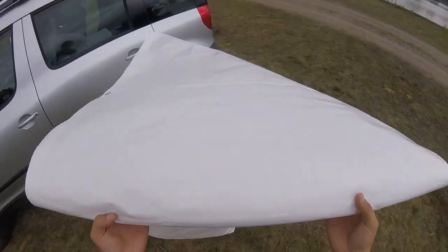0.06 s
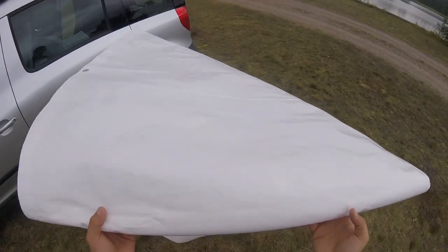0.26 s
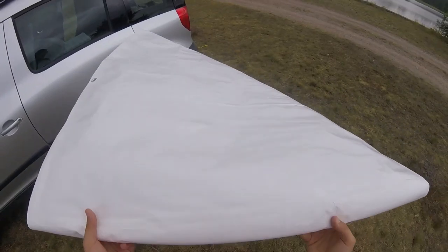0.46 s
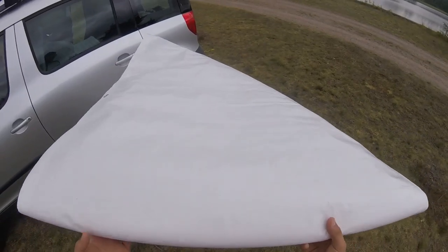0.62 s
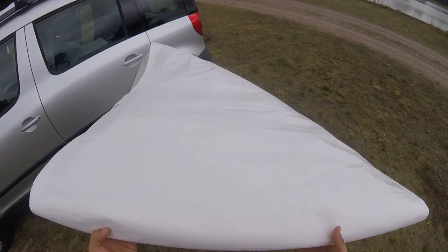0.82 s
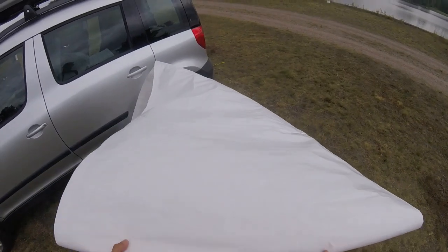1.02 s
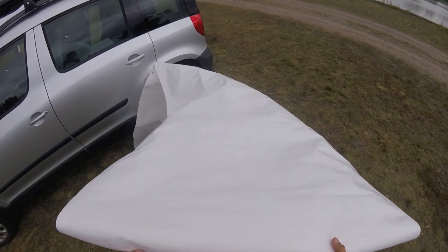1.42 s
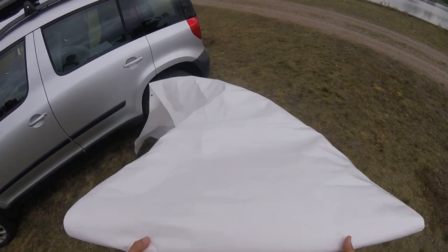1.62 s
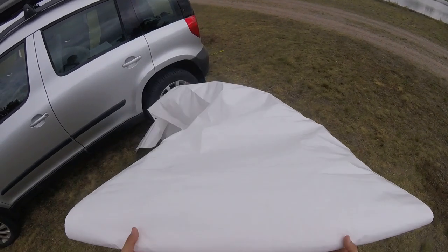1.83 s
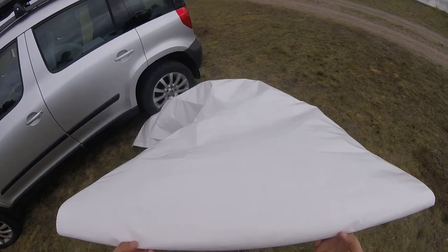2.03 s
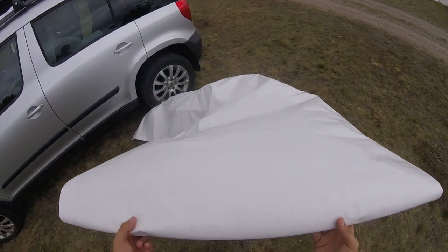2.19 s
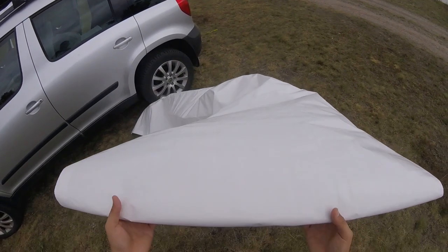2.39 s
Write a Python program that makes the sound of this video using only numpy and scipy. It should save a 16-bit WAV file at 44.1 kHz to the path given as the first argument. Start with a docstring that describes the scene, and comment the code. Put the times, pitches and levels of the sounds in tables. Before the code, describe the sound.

A stiff sheet snapping and rustling in the wind, with low buffeting on the microphone.

```python
"""Stiff fabric in a gusty wind

A sheet is held out on open grass. Its creases buckle with sharp snaps over a fine
crinkle and a steady rustle, and slack folds flap in dull puffs. Gusts rumble and eddies
thump on the microphone, whose port colours the treble."""
import sys
import numpy as np
from scipy import signal
from scipy.io import wavfile

SR = 44100
rng = np.random.default_rng(int(sys.argv[2]) if len(sys.argv) > 2 else 0)


def wav_out(sig):
    """Save sig, one row per channel (or a flat mono array), as 16-bit PCM at SR to the path in sys.argv[1]."""
    wavfile.write(sys.argv[1], SR, np.round(np.clip(np.atleast_2d(sig).T, -1, 1) * 32767).astype(np.int16))


N = 112454


# Creases buckling: (time [s], level [dB], pitch [Hz], dull body against the snap [dB])
CREASE_SNAPS = [(0.0167, -40, 5100, 6.5), (0.045, -33.5, 4800, -4), (0.0825, -24.5, 4520, -16),
                (0.0883, -30, 4940, -18), (0.1325, -39, 2970, -4), (0.2288, -35.5, 5450, 0),
                (0.2897, -28.5, 4700, -4.5), (0.5044, -36, 2950, -15), (0.5451, -34.5, 3770, -21),
                (0.6022, -24.5, 3900, -5), (0.6033, -23.5, 4500, -16), (0.6044, -29, 4100, -7),
                (0.6192, -25.5, 5070, -4), (0.7526, -28.5, 4550, -11), (0.7835, -27.5, 2520, -6),
                (0.785, -32.5, 3900, 0), (0.8969, -22, 3770, -7), (0.8975, -25, 6800, -24),
                (.9567, -40, 3430, -5), (1.1324, -30, 4970, -0.5), (1.166, -43, 2900, 7),
                (1.1810, -28, 6360, -6), (1.2785, -36, 4020, -10), (1.2977, -35, 4370, -11),
                (1.3202, -33.5, 3430, -4), (1.3657, -30, 5540, -6), (1.483, -37.5, 4700, -18),
                (1.5295, -40, 4470, 7.5), (1.6769, -41, 3230, -21), (1.6871, -31, 4400, 0.5),
                (1.7124, -27.5, 3370, 0), (1.763, -29.5, 5270, 1), (1.7829, -33.5, 4900, -1),
                (1.831, -31, 5600, 1.5), (1.9074, -26.5, 6480, -8), (2.0269, -27, 4330, -9),
                (2.077, -30.5, 5050, -4.5), (2.1985, -30, 4360, -3), (2.2258, -43.5, 3520, 11.5),
                (2.3689, -38, 3030, 0), (2.4057, -31.5, 4070, 0), (2.4299, -28, 5160, -8.5),
                (2.5152, -35, 4950, 2.5)]

def snaps():
    """A crease buckles with a bright crack and springs back, and the cloth around it shivers."""
    attack_s, grit_decay_s, edge_decay_s, body_decay_s = 0.00013, 0.0008, 0.00066, 0.0056
    recoil_s, ring_cycles, firm_db = 0.00094, 2.7, -27
    out, t = np.zeros(N), np.arange(SR // 20) / SR
    attack = 1 - np.exp(-t / attack_s)
    recoil = 0.41 * (t > recoil_s) * np.exp(-abs(t - recoil_s) / grit_decay_s)
    grit_envelope = np.exp(-t / grit_decay_s) + recoil
    for start, db, hz, body_db in CREASE_SNAPS:
        ring = np.sin(2 * np.pi * hz * t) * np.exp(-t * hz / ring_cycles)
        grit = 0.72 * np.tanh(band_noise(hz, octaves=1.09, size=len(t))) * grit_envelope
        edge = np.tanh(band_noise(hz=11650, octaves=0.99, size=len(t))) * np.exp(-t / edge_decay_s)
        edge *= from_db(-4.5 + 0.8 * (db - firm_db))  # harder snaps are brighter
        body = band_noise(hz=900, octaves=3.2, size=len(t)) * np.exp(-t / body_decay_s)
        body *= from_db(body_db - 11.5)
        add(out, start, from_db(db + 0.5) * attack * (ring + grit + edge + body))
    return out


# Slack folds flapping: (time [s], level [dB], pitch [Hz], decay [s])
FOLD_FLAPS = [(0.354, -42.5, 139, 0.025), (0.433, -41.5, 395, 0.02), (0.617, -38.5, 237, 0.032),
              (0.686, -38, 169, 0.027), (0.779, -38.5, 427, .012), (0.792, -29, 130, 0.02),
              (1.072, -36.5, 156, 0.039), (1.108, -31, 156, 0.046), (1.308, -33, 175, 0.024),
              (1.433, -34, 448, 0.013), (1.570, -43.5, 160, 0.031), (1.690, -43, 420, 0.022),
              (1.762, -39.5, 460, 0.013), (1.772, -29.5, 163, 0.016), (1.850, -40, 496, 0.028),
              (1.914, -36.5, 150, 0.011), (2.044, -38.5, 237, 0.019), (2.093, -22.5, 565, 0.0026),
              (2.205, -37, 151, 0.014)]

def flaps():
    """Slack folds push out short, dull puffs of air."""
    out, t = np.zeros(N), np.arange(SR // 4) / SR
    attack_s = 0.0038
    for start, db, hz, decay_s in FOLD_FLAPS:
        envelope = (1 - np.exp(-t / attack_s)) * np.exp(-t / decay_s)
        add(out, start, from_db(db) * envelope * band_noise(hz, octaves=1.04, size=len(t)))
    return out


# Tone of the crinkle: (frequency [Hz], relative tick strength [dB])
CRINKLE_TONE = [(400, 1), (1100, -3), (3000, 2.5), (5500, 6.5), (8000, -6.5)]

def crinkle():
    """Tiny creases tick in clumps, each ringing briefly around a pitch of its own."""
    ticks_per_s, clump_db, spread_db = 420, 2.5, 3
    width_octaves, ring_cycles = 0.25, 12.9  # cycles to fall by 60 dB
    low_hz, high_hz = CRINKLE_TONE[0][0], CRINKLE_TONE[-1][0]
    onsets = np.flatnonzero(rng.random(N) < ticks_per_s * from_db(clump_db * drift(rate_hz=12)) / SR)
    strength = from_db(spread_db * np.minimum(rng.exponential(1, N), 3.2))[onsets]
    octave = rng.uniform(np.log2(low_hz), np.log2(high_hz), N)[onsets]
    out = np.zeros(N)
    for hz in np.geomspace(low_hz, high_hz, 20):
        band_share = np.exp(-0.5 * ((np.log2(hz) - octave) / width_octaves) ** 2)
        ticks = np.zeros(N)
        ticks[onsets] = strength * rng.standard_normal(N)[onsets] * band_share
        radius = from_db(-60 * hz / (ring_cycles * SR))
        resonator = [1, -2 * radius * np.cos(2 * np.pi * hz / SR), radius ** 2]
        out += from_db(at_hz(CRINKLE_TONE, hz)) * signal.lfilter([1, 0, -1], resonator, ticks + 1e-18)
    return rms_one(out)


# Tone of the rustle: (frequency [Hz], relative noise density [dB])
RUSTLE_TONE = [(100, 7.5), (500, 9.5), (760, -1.5), (1500, -2), (3000, -6.5), (6000, -10), (9000, -11.5),
               (11000, -27), (14000, -26)]
# Fader ride shared by rustle and crinkle: (time [s], level [dB])
CLOTH_RIDE = [(0, -56), (.10, -50), (.2, -53.5), (.33, -54.5), (.45, -52.5), (.56, -54.5), (.68, -51),
              (.81, -55.5), (.88, -50), (.97, -53), (1.06, -51.5), (1.25, -54), (1.37, -52), (1.62, -54),
              (2.0, -57), (2.28, -52.5), (2.40, -49), (2.55, -53.5)]

def stirring_cloth():
    """The moving sheet gives a flickering rustle that swells and eases together with its crinkle."""
    rustle = from_db(2.5) * coloured_noise(RUSTLE_TONE, flicker_db=1.88, rate_hz=18.8)
    return from_db(in_time(CLOTH_RIDE)) * (rustle + from_db(-0.5) * crinkle())


# Tone of the wind rumble: (frequency [Hz], relative noise density [dB])
RUMBLE_TONE = [(20, 2.5), (30, 7.5), (48, 3), (120, -12), (200, -27.5), (320, -32.5), (600, -49)]
# Rise and fall of the wind pressure: (time [s], level [dB])
GUST_RIDE = [(0, -55.5), (.12, -42), (.30, -41), (.50, -35), (.57, -48.5), (.63, -30), (.76, -41),
             (.83, -37), (.97, -38), (1.19, -32), (1.36, -27.5), (1.46, -41), (1.78, -32), (1.85, -40.5),
             (1.98, -33.5), (2.19, -30.5), (2.30, -42.5), (2.55, -45.5)]

def gust_rumble():
    """Gusts press on the microphone with a low, lumpy rumble."""
    rumble = coloured_noise(RUMBLE_TONE, flicker_db=2.5, rate_hz=22.7)
    return from_db(in_time(GUST_RIDE) + 1.5) * rumble


# Eddies hitting the microphone: (time [s], level [dB], pitch [Hz])
EDDY_THUMPS = [(0.207, -28, 80), (0.349, -19, 56), (0.408, -29.5, 52.3), (0.460, -36, 72),
               (0.621, -33, 112), (0.792, -24, 51), (1.106, -19.5, 114), (1.136, -20.5, 67),
               (1.175, -25, 66), (1.306, -16.5, 95.6), (1.359, -18.5, 43.7), (1.569, -27, 43),
               (1.685, -21.5, 55), (1.758, -16.5, 32.1), (1.912, -17.5, 41.6), (2.047, -14.5, 42.2),
               (2.100, -22, 64.5), (2.163, -22.5, 70)]

def eddy_thumps():
    """Each eddy is a bass thump that swells and dies within two or three swings."""
    out, t = np.zeros(N), np.arange(SR // 4) / SR
    rise_cycles = 0.46
    for start, db, hz in EDDY_THUMPS:
        age = t * hz / rise_cycles
        envelope = (age * np.exp(1 - age)) ** 2
        add(out, start, from_db(db) * envelope * np.sin(2 * np.pi * hz * t))
    return out


def from_db(db):
    """Decibels to gain."""
    return 10 ** (np.asarray(db) / 20)


def rms_one(x):
    """Scale to unit power."""
    return x / np.sqrt(np.mean(x ** 2) + 1e-20)


def in_time(ride):
    """A fader ride at every sample."""
    return np.interp(np.arange(N) / SR, *np.transpose(ride))


def at_hz(tone, hz):
    """Read a tone curve in dB on a log-frequency axis."""
    freqs, db = np.transpose(tone)
    return np.interp(np.log(hz), np.log(freqs), db)


def drift(rate_hz):
    """A smooth random wobble with a spread of about 1."""
    hop, settle = 40, 2000
    pole = np.exp(-2 * np.pi * rate_hz * hop / SR)
    noise = rng.standard_normal(N // hop + settle + 2)
    slow = signal.lfilter([1], [1, -2 * pole, pole ** 2], noise)[settle:]
    return np.interp(np.arange(N) / hop, np.arange(len(slow)), rms_one(slow))


def band_noise(hz, octaves, size):
    """Unit-power noise in a band around a centre."""
    edges = np.clip([hz / 2 ** (octaves / 2), hz * 2 ** (octaves / 2)], 10, 0.45 * SR)
    bandpass = signal.butter(2, edges, "band", fs=SR, output="sos")
    return rms_one(signal.sosfilt(bandpass, rng.standard_normal(size + SR // 10))[-size:])


def coloured_noise(tone, flicker_db, rate_hz):
    """Unit-power noise in half-octave bands that flicker partly together and partly alone."""
    out, together = np.zeros(N), drift(rate_hz)
    low_hz, high_hz = tone[0][0], tone[-1][0]
    for hz in low_hz * 2 ** np.arange(0, np.log2(high_hz / low_hz) + 0.25, 0.5):
        db = at_hz(tone, hz) + flicker_db * (together + 0.97 * drift(rate_hz))
        out += from_db(db) * np.sqrt(hz) * band_noise(hz, octaves=0.55, size=N)
    return rms_one(out)


def add(out, start, sound):
    """Mix a sound in at a time in seconds."""
    i = max(int(start * SR), 0)
    out[i:i + len(sound)] += sound[:max(N - i, 0)]


def scene():
    """The sheet at arm's length and the wind on the microphone, in mono."""
    return (stirring_cloth() + snaps() + flaps() + gust_rumble() + eddy_thumps())[None]


def record(dry):
    """The microphone port carves a notch beside a peak and dulls the top; faint hiss joins in."""
    port_top_hz, treble_leak, stopband_hz = 8610, 0.021, 14960
    notch = signal.lfilter(*signal.iirpeak(6240, Q=47, fs=SR), dry)
    peak = signal.lfilter(*signal.iirpeak(6540, Q=31, fs=SR), dry)
    coloured = dry - 0.66 * notch + 0.77 * peak
    dulled = signal.sosfilt(signal.butter(6, port_top_hz, fs=SR, output="sos"), coloured)
    hiss = from_db(-70.5) * rng.standard_normal(N)
    high_cut = signal.cheby2(12, 60, stopband_hz, fs=SR, output="sos")
    return signal.sosfilt(high_cut, dulled + treble_leak * coloured + hiss)


dry = scene()
out = record(dry)
wav_out(out)
```